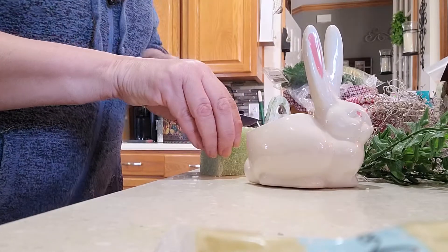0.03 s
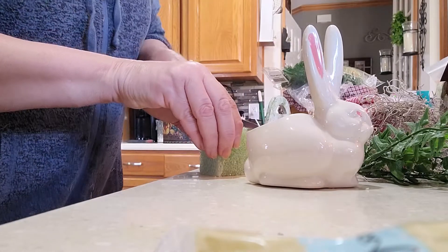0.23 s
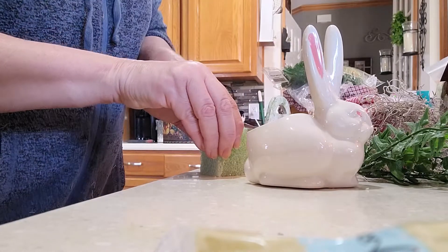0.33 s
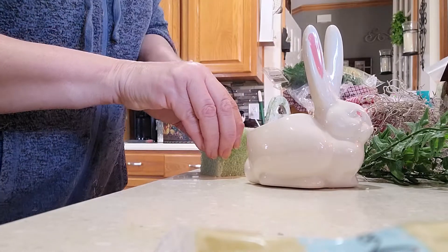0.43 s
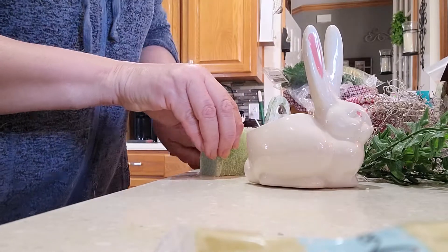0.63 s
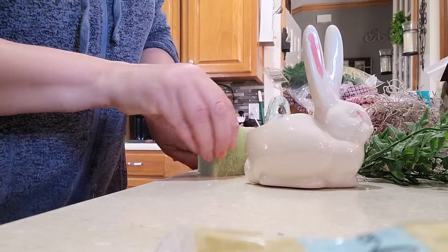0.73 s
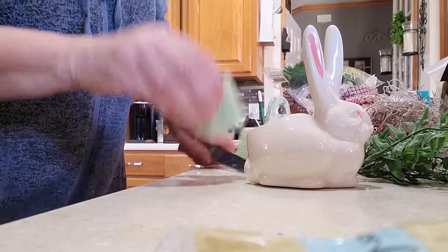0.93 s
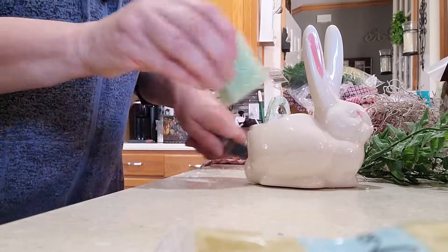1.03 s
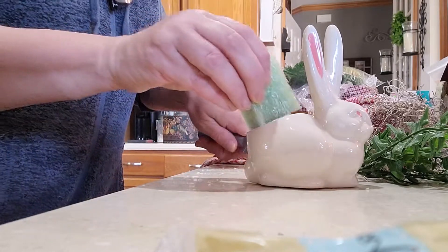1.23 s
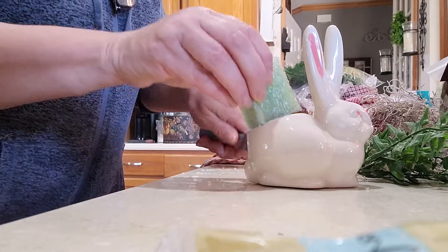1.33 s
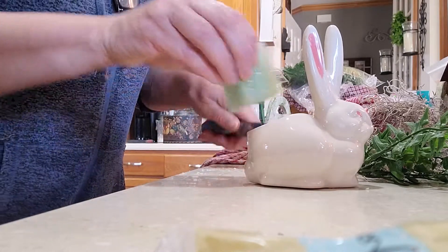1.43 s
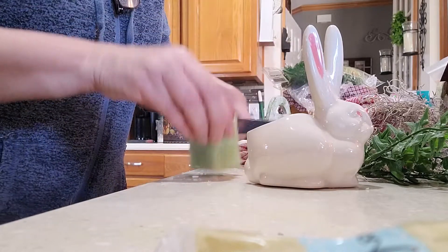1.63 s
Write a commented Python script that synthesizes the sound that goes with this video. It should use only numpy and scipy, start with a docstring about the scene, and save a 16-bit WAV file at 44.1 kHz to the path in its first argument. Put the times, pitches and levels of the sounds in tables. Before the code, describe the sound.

Dry floral foam crunches and crackles under a knife, heard up close in a quiet kitchen, until the blade knocks the counter. A faint rustle and a brief metallic scrape follow, then a few soft bumps of foam on a ceramic vase.

```python
"""A knife crunches through a block of dry floral foam, whose brittle cell walls fracture in clusters
while the push of the hand rumbles in the kitchen counter. The blade knocks on the counter and the piece
breaks free. Fingers rustle on the foam; the blade slides off, set faintly ringing by friction, and its
tip ticks clear. Last, the foam bumps softly against a hollow ceramic vase and excites its modes."""
import sys
import numpy as np
from scipy import signal
from scipy.fft import rfft, irfft
from scipy.io import wavfile
from scipy.ndimage import map_coordinates

SR = 44100
rng = np.random.default_rng(int(sys.argv[2]) if len(sys.argv) > 2 else 0)


def file_out(sig):
    """Save sig as 16-bit WAV at sys.argv[1]."""
    # one column per channel
    cols = np.atleast_2d(sig).T
    # limit, then scale
    lim = np.clip(cols, -1, 1)
    pcm = np.round(lim * 32767).astype(np.int16)
    wavfile.write(sys.argv[1], SR, pcm)


N = 74970
T = np.arange(N) / SR
LEFT_LEAD_S = .00012  # sound from the foam reaches the left side first


def amp(db):
    """Amplitude ratio of a level in decibels."""
    return 10 ** (np.asarray(db) / 20)


def unit(x):
    """Normalisation to an rms of 1."""
    return x / np.sqrt(np.mean(x ** 2) + 1e-20)


def level(curve):
    """Amplitude envelope through (s, dB) points."""
    return amp(np.interp(T, *np.transpose(curve)))


def panned(db):
    """Constant-power gains for a balance, the left level minus the right."""
    gains = amp(np.array([[.5], [-.5]]) * db)
    return gains / np.sqrt(np.mean(gains ** 2, axis=0))


def through(x, response):
    """Convolution with an impulse response, cut to the scene's length."""
    return signal.fftconvolve(np.atleast_2d(x), np.atleast_2d(response), axes=1)[:, :N]


def coloured(x, spectrum, pan, size=8192):
    """Minimum-phase filter of unit energy; spectrum and balance are (Hz, dB) points."""
    log_hz = np.log(np.fft.rfftfreq(size, 1 / SR) + 1)
    db, pan_db = [np.interp(log_hz, np.log(hz), dbs) for hz, dbs in map(np.transpose, (spectrum, pan))]
    cepstrum = irfft(np.log(amp(db) * panned(pan_db)))
    cepstrum[:, 1:size // 2] *= 2  # folding the cepstrum makes the filter causal
    cepstrum[:, size // 2 + 1:] = 0
    response = irfft(np.exp(rfft(cepstrum)))
    return through(x, unit(response) / np.sqrt(size))


def shelved(x, hz, low_db=0, high_db=0):
    """First-order shelf: separate gains below and above a turnover frequency."""
    low = signal.lfilter(*signal.butter(1, hz, fs=SR), x)
    return amp(low_db) * low + amp(high_db) * (x - low)


def band(x, hz, width):
    """Band-pass filter whose edges lie a frequency ratio either side of its centre."""
    sos = signal.butter(2, [hz / width, hz * width], "band", fs=SR, output="sos")
    return signal.sosfilt(sos, x + 1e-18)


def clicks(rows):
    """Impulse excitation, one for each row that begins (s, dB)."""
    out = np.zeros(N)
    for s, db, *_ in rows:
        out[int(s * SR)] += amp(db)
    return out


def mode(hz, t60):
    """Free vibration of a damped oscillator, falling 60 dB in t60 seconds."""
    return np.sin(2 * np.pi * hz * T) * amp(-60 * T / t60)


def body(modes):
    """Modal superposition: a struck object rings as a sum of damped sines, here of alternating sign."""
    return sum((-1) ** k * amp(db) * panned(pan) * mode(hz, t60)
               for k, (hz, db, t60, pan) in enumerate(modes))


def grains(per_s=7000, spread_db=3):
    """Shot noise: dense tiny fractures of uneven size, independent on each side."""
    sizes = amp(spread_db * np.minimum(rng.exponential(1, (2, N)), 5))
    signs = rng.choice([-1, 1], (2, N))
    return unit(sizes * signs * (rng.random((2, N)) < per_s / SR))


def crack(decay_s, rise_s=.00013, size=1024):
    """A fracture avalanche: a burst of noise with exponential decay."""
    fade = np.exp(-T[:size] / decay_s) * (1 - np.exp(-T[:size] / rise_s))
    fade = fade / fade.max()
    return unit(rng.standard_normal((2, size)) * fade) * np.sqrt(np.mean(fade ** 2))


def scattered(x, db, t60):
    """Early reflections from counter, vase and hands join the direct sound."""
    spray = unit(rng.standard_normal((2, N)) * amp(-60 * T / t60) * (T > .001)) / np.sqrt(N)
    return x + amp(db) * through(x, spray)


def spaced(x, share=.4):
    """Path difference: part of the left sound reaches the right a moment later."""
    delayed = np.interp(T - LEFT_LEAD_S, T, x[0])
    return np.array([x[0], share * delayed + np.sqrt(1 - share ** 2) * x[1]])


# Spectrum of the room's air. Each row: frequency in Hz, relative level in dB.
AIR_SPECTRUM = [(20, -18), (52, 4), (80, -11), (122, -3), (180, -16), (300, -13), (600, -21.5),
                (1500, -35.5), (4000, -46.5), (15000, -43.5)]


def air():
    """Ambient noise: quiet, low and largely coherent between the two sides."""
    noise = unit(rng.standard_normal(N) + .4 * rng.standard_normal((2, N)))
    return amp(-65) * coloured(noise, AIR_SPECTRUM, pan=[(100, -1.4)])


# The kitchen's decay. Each row: frequency in Hz, reverberation time in seconds, level in dB.
ROOM_DECAY = [(150, 0.15, -9), (500, .36, -10), (1490, 0.38, -16.5), (4000, 0.27, -10.5),
              (9000, 0.82, -14.5), (15000, .4, -14.5)]


def kitchen(x):
    """Reverberation: the diffuse field builds up, then dies at its own rate in each octave."""
    hz, t60, db = np.transpose(ROOM_DECAY)
    edges = np.geomspace(35, 18000, 10)
    tail = 0
    for low, high in zip(edges, edges[1:]):
        band_t60, band_db = [np.interp(np.log(low * high) / 2, np.log(hz), c) for c in (t60, db)]
        fade = unit(amp(-60 * T / band_t60) * (1 - np.exp(-T / .0087))) / np.sqrt(N)
        octave = signal.butter(2, [low, high], "band", fs=SR, output="sos")
        tail = tail + amp(band_db) * fade * signal.sosfilt(octave, rng.standard_normal((2, N)))
    return through(x, tail)


# Fingers rubbing the block. Each row: time in seconds, level in dB.
RUB_LEVEL = [(0, -71.5), (.8, -75.5), (.89, -50.5), (.96, -67.5), (1.02, -92), (1.1, -65), (1.19, -61),
             (1.28, -69.5), (1.34, -71), (1.41, -70), (1.47, -66.5), (1.52, -63.5), (1.56, -68.5),
             (1.61, -67), (1.66, -83), (1.7, -77)]
# Crumbs breaking off. Each row: start in seconds, level in dB.
CRUMB_CRACKS = [(1.305, -57), (1.3556, -51), (1.3696, -57), (1.4255, -53), (1.444, -56.5), (1.4698, -47),
                (1.556, -48)]
# Spectrum of rubbed foam. Each row: frequency in Hz, relative level in dB.
RUSTLE_SPECTRUM = [(400, -16.5), (750, 2.5), (1100, -3), (1700, -2.5), (3200, -14), (5700, 0), (8000, -2.5),
                   (11000, -2), (15500, -7)]


def fingers():
    """Friction on a brittle surface: the foam rustles and crumbs crack off."""
    rubbing = level(RUB_LEVEL) * grains()
    crumbs = through(clicks(CRUMB_CRACKS), crack(decay_s=.0024))
    return coloured(rubbing + crumbs, RUSTLE_SPECTRUM, pan=[(1500, -2.5), (5000, 3), (14000, .5)])


def tip_flick():
    """A release transient: the blade's tip leaves the foam with a soft, dry tick."""
    return through(clicks([(1.073, -36.5)]), band(crack(decay_s=.0047), hz=1700, width=1.3))


# The blade's modes. Each row: frequency in Hz, relative level in dB, t60 in seconds, balance in dB.
BLADE_MODES = [(828, -8, .045, -15), (1750, -9.5, 0.1, -19), (2457, -1.5, 0.043, -16), (3034, 3, 0.034, 4),
               (4370, -2.5, 0.021, 12), (4470, 3, .07, 6.5), (6030, -7, .05, 17), (6140, -7.5, .05, 0),
               (7640, -9, 0.055, 0), (11480, -1.5, 0.034, 20), (14100, -5, 0.034, 15),
               (15140, -10, .03, 10)]
# Radiation of the foam to the two sides. Each row: frequency in Hz, balance in dB.
FOAM_BALANCE = [(500, -1.5), (1100, -8.5), (2200, -0.5), (4000, 4), (9000, 4), (14000, 10)]


def blade_slide(peak_s=1.05, rise_s=.0081, fall_s=.019, leave_s=1.08, release_s=.0084):
    """Forced vibration: a swell of friction hisses and drives the blade's modes until contact is lost."""
    swell = np.exp(-np.maximum((peak_s - T) / rise_s, (T - peak_s) / fall_s))
    swell *= np.exp(-np.maximum(T - leave_s, 0) / release_s)
    slide = amp(-49) * coloured(swell * grains(), RUSTLE_SPECTRUM, FOAM_BALANCE)
    for hz, db, t60, pan in BLADE_MODES:
        ring = unit(through(swell * rng.standard_normal(N), mode(hz, t60))) * np.sqrt(np.mean(swell ** 2))
        slide = slide + amp(db - 45.5) * panned(pan) * ring
    sag_per_s = .523  # share of the pitch lost as the blade's free length grows
    clock = T - .5 * sag_per_s * (T - peak_s) ** 2
    return np.array([map_coordinates(side, [(clock - lag) * SR], order=3)
                     for side, lag in zip(slide, (0, LEFT_LEAD_S))])


# Foam meeting the vase. Each row: start in seconds, relative level in dB, treble gain in dB.
VASE_CONTACTS = [(1.3551, -41.5, -15), (1.3683, -41.5, -10), (1.3964, -36.5, -2), (1.4186, -21, -1),
                 (1.4225, -28, -3), (1.4442, -23.5, 7), (1.4502, -43, -18), (1.495, -32.5, -4),
                 (1.4986, -29, -5.5), (1.5091, -27.5, -2.5), (1.5412, -39, -8), (1.547, -36.5, -16),
                 (1.583, -48.5, -15.5)]
# Spectrum of a soft contact. Each row: frequency in Hz, relative level in dB.
THUD_SPECTRUM = [(40, -19), (130, -1.5), (300, 2), (600, 5), (1200, -2.5), (1800, -9.5), (2500, -25.5),
                 (3500, -35.5), (6000, -52), (15000, -41)]
# The vase's modes. Each row: frequency in Hz, relative level in dB, t60 in seconds, balance in dB.
VASE_MODES = [(231.3, -21, 0.169, -9), (281.3, -19, 0.14, -6.5), (369, -12, 0.11, -6), (511.3, -15, 0.1, 6),
              (666.6, -21, .14, -6), (1172, -34, 0.047, 11), (2382, -30, 0.078, -3)]
# The block dragging over the vase. Each row: time in seconds, level in dB.
DRAG_LEVEL = [(1.39, -83), (1.43, -53), (1.48, -49.5), (1.53, -48.5), (1.6, -52.5), (1.64, -65),
              (1.7, -85.5)]


def vase_bumps():
    """Soft impacts thud and excite the hollow vase's resonances; sliding friction adds a low drag."""
    hits = sum(shelved(clicks([(s, db)]), hz=1500, high_db=treble) for s, db, treble in VASE_CONTACTS)
    thud = amp(12.5) * coloured(hits, THUD_SPECTRUM, pan=[(200, -5.5), (550, -.5), (2000, -5.5), (6000, 7)])
    drag = level(DRAG_LEVEL) * panned(db=-5.5) * unit(band(rng.standard_normal(N), hz=280, width=1.25))
    return scattered(thud, db=1.5, t60=.067) + through(hits, body(VASE_MODES)) + drag


# Rumble under the hand's weight. Each row: time in seconds, level in dB.
PUSH_LEVEL = [(0, -55), (.09, -62.5), (.14, -50), (.195, -55.5), (.215, -37.5), (.29, -44.5), (.35, -41),
              (.39, -38.5), (.47, -41.5), (.52, -33.5), (.6, -35.5), (.68, -51.5), (.8, -64.5),
              (.98, -76.5)]
# Spectrum of that rumble. Each row: frequency in Hz, relative level in dB.
RUMBLE_SPECTRUM = [(20, -17), (48, 1.5), (80, -4), (130, 2.5), (180, -4), (250, 0.5), (380, -4.5),
                   (550, -11.5), (1200, -14.5), (4000, -49.5)]


def push_rumble():
    """Structure-borne sound: the push of the hand shudders through the counter."""
    shudder = unit(rng.standard_normal(N) + .71 * grains())
    return coloured(level(PUSH_LEVEL) * shudder, RUMBLE_SPECTRUM, pan=[(60, -2.5), (250, -3)])


# The counter's modes. Each row: frequency in Hz, relative level in dB, t60 in seconds, balance in dB.
COUNTER_MODES = [(53.7, -18.5, 0.25, 1.5), (82, -16.5, .14, -1.5), (249.4, -17, 0.14, -4.5),
                 (353, -14, 0.087, -7), (512, -19.5, 0.29, 1), (685, -4.5, 0.089, -4.5),
                 (887.5, -1.5, 0.032, 0), (953, 1.5, 0.046, -8.5), (1206, 4.5, 0.033, -5),
                 (1382, -4.5, 0.073, -10), (1681, -2, .06, -10), (2290, -13.5, .04, -4.5),
                 (3700, 2, 0.0092, 5), (4625, 3.5, 0.011, 6)]


def counter_knock(start_s=.5652):
    """Impact excitation: the blade lands once and all the counter's modes ring."""
    knock = through(clicks([(start_s, -13.5)]), body(COUNTER_MODES))
    return scattered(knock, db=-10.5, t60=.06)


def squeak(peak_s=.234, width_s=.004, hz=1955):
    """Stick-slip friction: the blade catches in the foam and sounds one brief tone."""
    return amp(-25) * np.exp(-((T - peak_s) / width_s) ** 2) * np.sin(2 * np.pi * hz * T)


# Clusters of cell walls giving way. Each row: start in seconds, relative level in dB,
# decay time in seconds, gain of the lower band in dB.
CELL_SNAPS = [(0.0225, -30.5, .001, -13.5), (.047, -43.5, 0.0013, -5.5), (.126, -16, .001, 0),
              (0.1338, -25.5, .001, -5), (0.1818, -35.5, .001, -4.5), (0.2036, -21.5, 0.00043, 0.5),
              (0.2064, -19, 0.0019, 1.5), (0.2316, -17.5, 0.0015, 5.5), (0.2354, -21.5, .002, 3.5),
              (.26, -11, .001, -2.5), (0.2772, -15.5, 0.00065, 4.5), (0.3082, -12, .001, -0.5),
              (.321, -29, .0015, -7), (0.349, -18.5, .001, -2.5), (0.3728, -17, .001, -4),
              (0.376, -10, .0012, -4), (.384, -10, .002, 0), (0.3971, -10.5, .0012, 1),
              (0.408, -13, .001, -6.5), (0.4249, -15.5, .001, 2), (0.43, -6.5, .001, -1.5),
              (0.4398, -14.5, .0015, 0.5), (0.4819, -7.5, .0014, -5), (0.4845, -10.5, .001, 0.5),
              (.4973, -9, .0015, -3.5), (0.5078, -8, .0013, -7.5), (0.5173, -12, .001, -2.5),
              (0.5224, -9.5, .0012, -1), (0.53, -13.5, .0015, 1.5), (0.5639, -5, .0015, -0.5),
              (0.6545, -22, .001, -3), (0.663, -11, .0013, 1), (0.7258, -25, .0015, -5),
              (0.733, -28, .002, -2.5), (.738, -25, .002, -12), (0.7702, -31, .001, -23),
              (0.7774, -30, 0.0012, -20), (0.863, -30, 0.00086, -5), (.971, -45.5, 0.0013, -10)]


def snaps():
    """Sudden release of elastic energy: each failing cluster emits a sharp crack."""
    return sum(through(clicks([(s, db)]), shelved(crack(decay_s), hz=3040, low_db=low_db))
               for s, db, decay_s, low_db in CELL_SNAPS)


def counter_thumps():
    """Cushioned transmission: each snap jolts the counter, softened by the foam."""
    jolts = band(clicks(CELL_SNAPS), hz=269, width=1.4)
    return amp(-14) * through(jolts, body(COUNTER_MODES))


# Grating along the cut. Each row: time in seconds, relative level in dB.
CRUNCH_LEVEL = [(0, -66.5), (.1, -66), (.14, -51), (.195, -56), (.21, -33.5), (.255, -32), (.285, -26.5),
                (.325, -29), (.365, -39.5), (.385, -25), (.44, -27.5), (.475, -35.5), (.5, -21),
                (.562, -17.5), (.578, -26.5), (.65, -39.5), (.72, -45.5), (.8, -55.5), (.9, -60),
                (.96, -107)]
# Spectrum of breaking foam. Each row: frequency in Hz, relative level in dB.
FOAM_SPECTRUM = [(300, -16.5), (700, -7.5), (1200, 0), (2000, 3.5), (3000, 0.5), (4200, -3), (5400, -6),
                 (7500, -2), (9000, -6.5), (11500, -2), (15500, -9.5)]


def foam_crunch(clump_s=.003, clump_db=2.5):
    """Brittle fracture: cells break in random clumps, the block resonates, and snaps stand out on top."""
    knots = np.arange(0, T[-1], clump_s)
    clumps = unit(amp(clump_db * np.interp(T, knots, rng.standard_normal(N)[:len(knots)])))
    grating = level(CRUNCH_LEVEL) * clumps * grains()
    resonance = amp(-7.5) * band(grating, hz=2640, width=1.88)
    fractures = amp(-1) * (grating + resonance) + snaps()
    radiated = scattered(spaced(fractures), db=-6, t60=.02)
    return amp(-2.5) * coloured(radiated, FOAM_SPECTRUM, FOAM_BALANCE)


def scene():
    """Superposition of the direct sounds, the quiet air and the kitchen's reverberation."""
    cut = foam_crunch() + squeak() + counter_thumps() + push_rumble()
    work = cut + counter_knock() + fingers() + tip_flick()
    slide, bumps = blade_slide(), vase_bumps()
    return work + slide + bumps + air() + kitchen(work + amp(-11) * slide + amp(-7.5) * bumps)


def record(dry):
    """Clipping flattens the highest peaks; a steep low-pass removes the extreme treble."""
    low_pass = signal.cheby2(16, 70, 16800, fs=SR, output="sos")
    return signal.sosfilt(low_pass, np.clip(dry, -.92, .92))


dry = scene()
out = record(dry)
file_out(out)
```